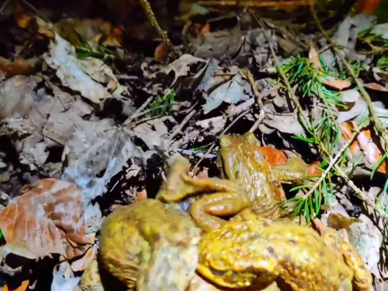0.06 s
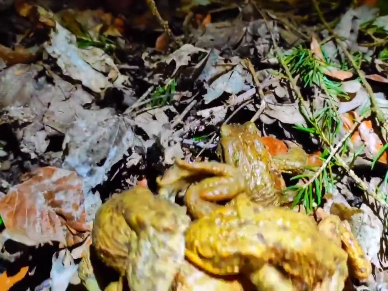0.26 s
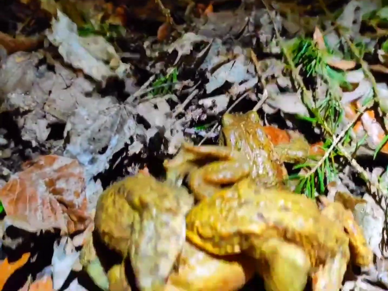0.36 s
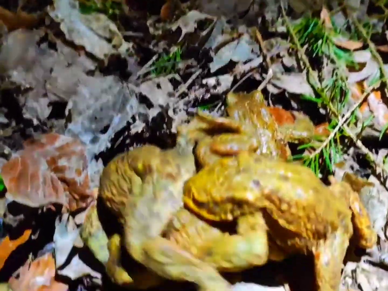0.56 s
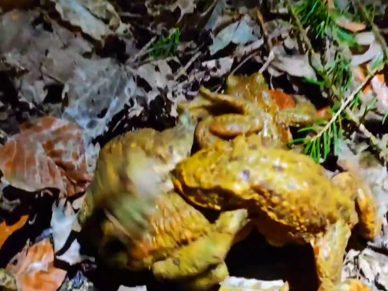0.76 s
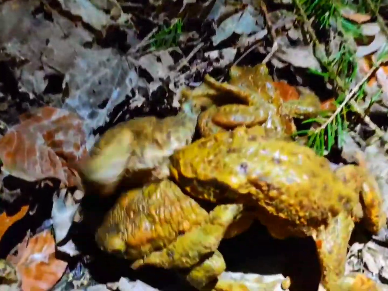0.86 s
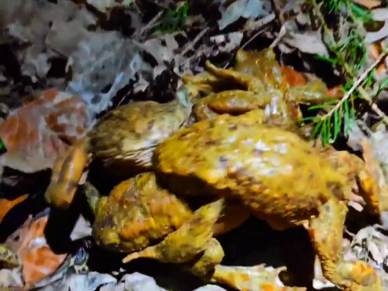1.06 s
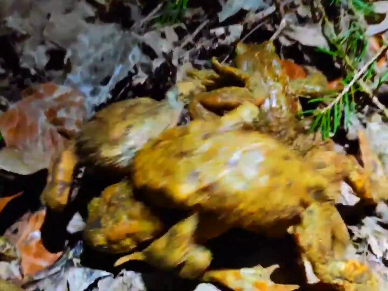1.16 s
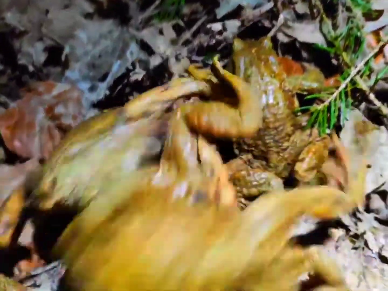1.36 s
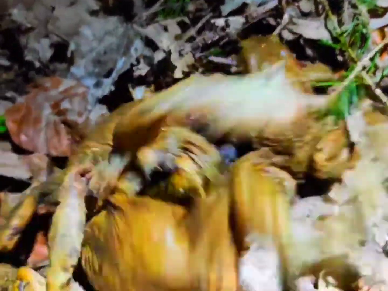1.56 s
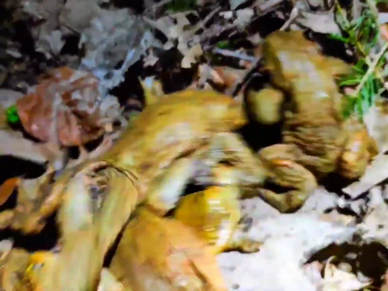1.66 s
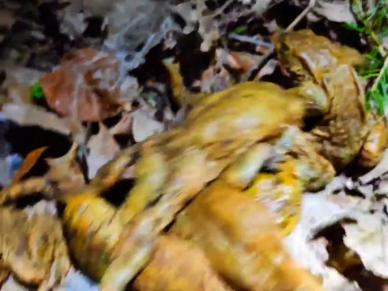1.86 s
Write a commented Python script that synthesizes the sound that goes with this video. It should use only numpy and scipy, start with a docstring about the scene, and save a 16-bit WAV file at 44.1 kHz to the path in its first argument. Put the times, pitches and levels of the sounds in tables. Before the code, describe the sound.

Dry leaves rustle and crunch under kicking toads, with one short, clear toad chirp.

```python
"""A hand rumbles on a camera, over faint hiss, while a fingertip rubs the right microphone port.
The finger bumps the covered port, then comes unstuck with a pop as its seal breaks.
Close by, toads scramble over dry leaves on a forest floor, shuffling lightly, then kicking hard;
the leaves crackle, snap and crunch under their weight.
As the kicking starts, one toad gives a short, clear chirp."""
import sys
import numpy as np
from scipy import signal
from scipy.fft import rfft, irfft, next_fast_len
from scipy.io import wavfile
from scipy.ndimage import map_coordinates

SR = 44100
rng = np.random.default_rng(int(sys.argv[2]) if len(sys.argv) > 2 else 0)


def generate_wav(sig):
    """Save sig (samples, or channels by samples) to the path in sys.argv[1] as 16-bit PCM at SR."""
    pcm = np.round(np.clip(np.atleast_2d(sig).T, -1, 1) * 32767).astype(np.int16)
    wavfile.write(sys.argv[1], SR, pcm)


N = 85995
TIME_S = np.arange(N) / SR


def amp(db):
    """Decibels to gain."""
    return 10 ** (np.asarray(db) / 20)


def unit(x):
    """Scale to rms 1."""
    return x / np.sqrt(np.mean(x ** 2) + 1e-20)


def along(points, hz):
    """Interpolate (frequency, value) points on a log axis."""
    f, v = np.transpose(points)
    return np.interp(np.log(hz + 1), np.log(f + 1), v)


def curves(rows):
    """One per-sample curve for each column after the time."""
    s, *cols = np.transpose(rows)
    return [np.interp(TIME_S, s, c) for c in cols]


def wobble(rate_hz):
    """Smooth random curve with knots at rate_hz."""
    return map_coordinates(rng.standard_normal(int(N * rate_hz / SR) + 4), [TIME_S * rate_hz])


def filtered(x, response):
    """Apply a complex frequency response."""
    m = next_fast_len(N + SR // 2)
    return irfft(rfft(x, m) * response(np.fft.rfftfreq(m, 1 / SR)), m)[..., :N]


def noise(colour, channels=1):
    """Coloured noise, rms 1."""
    return unit(filtered(rng.standard_normal((channels, N)), lambda hz: amp(along(colour, hz))))


def pan_gains(pan_db):
    """Left and right gain; pan is left minus right."""
    return amp(np.array([[.5], [-.5]]) * pan_db)


def mid_side_gains(correlation, hz):
    """Mid and side weights for a left-right correlation table."""
    angle = np.arccos(np.clip(along(correlation, hz), -1, 1)) / 2
    return np.array([np.cos(angle), np.sin(angle)])


# Background spectra (frequency [Hz], gain [dB])
RUMBLE_COLOUR = [(15, 0.5), (35, -1), (60, -8), (110, -13), (200, -19), (400, -26), (800, -34.5),
                 (2000, -43.5), (5000, -44)]
HISS_COLOUR = [(500, 36), (2000, 14), (5000, 6), (8500, -28), (10000, -12), (12000, -30), (15000, -14)]

def rumble_and_hiss():
    """The hand on the camera rumbles unevenly over steady hiss."""
    rumble = amp(-47.5 + 1.5 * wobble(8.39)) * noise(RUMBLE_COLOUR, channels=2)
    hiss = amp(-69.5) * noise(HISS_COLOUR, channels=2)
    return rumble + hiss


# Skin friction (time [s], level [dB])
RUB_LEVEL = [(0, -45), (.1, -48.5), (.19, -37.5), (.22, -33), (.275, -33), (.3, -38), (.34, -40), (.4, -36),
             (.46, -52)]
# Friction spectrum (frequency [Hz], gain [dB])
RUB_SPECTRUM = [(20, 7), (50, -2.5), (100, -5), (160, -18.5), (230, -18), (400, -33.5), (1000, -40),
                (3000, -80.5)]
# Soft knocks (time [s], gain [dB], half width [s])
FINGER_BUMPS = [(.212, -28, .003), (.229, -21, .004), (.27, -20, .0035)]

def finger_rub():
    """The fingertip shifts on the port; each bump is one swing of pressure."""
    rub_db, = curves(RUB_LEVEL)
    sound = amp(rub_db) * noise(RUB_SPECTRUM)[0]
    for s, db, half_width_s in FINGER_BUMPS:
        offset = (TIME_S - s) / half_width_s
        sound += amp(db) * offset * np.exp(-.5 * offset ** 2)
    return sound


POP_S, PORT_LEAK_HZ = .339, 27
PULL_LEAD_S, PULL_RISE_S, RELEASE_S, PEEL_DECAY_S = .0195, .012, .00023, .03
# Skin tearing free (time [s], gain [dB], width [ms])
SKIN_TEARS = [(0.33, -26, 0.77), (0.3343, -19.5, 0.47), (.339, -1.5, 0.19), (.348, -25.5, 0.11),
              (0.3604, -25.5, 0.1), (0.364, -15.5, 0.084)]
# Port response and peeling spectrum (frequency [Hz], gain [dB])
PORT_COLOUR = [(1800, 0), (3200, -6), (6000, 3), (9000, -1)]
PEEL_SPECTRUM = [(300, -2), (1500, 5), (4000, 3.5), (7000, 1), (10000, -34), (14000, -6)]

def finger_pop():
    """The lifting finger sucks at the leaky port; the seal breaks and skin peels off in ticks."""
    age = np.maximum(TIME_S - POP_S, 0)
    pull = np.clip((TIME_S - POP_S + PULL_LEAD_S) / PULL_RISE_S, 0, 1)
    suction = amp(-7.5) * np.sin(np.pi / 2 * pull) ** 2 * np.exp(-age / RELEASE_S)
    tears = sum(amp(db) * np.exp(1 - np.hypot(1, 2000 * (TIME_S - s) / width_ms))
                for s, db, width_ms in SKIN_TEARS)
    port = lambda hz: amp(along(PORT_COLOUR, hz)) * 1j * hz / (1j * hz + PORT_LEAK_HZ)
    peel = amp(-45) * (TIME_S > POP_S) * np.exp(-age / PEEL_DECAY_S) * noise(PEEL_SPECTRUM)[0]
    return filtered(-suction - tears, port) + peel


def leaf_scrapes(x, depth_db=2.5, patch_hz=833, patch_s=.022):
    """Each leaf scrapes in its own band for a moment: random gain in time-frequency patches."""
    hz, t, spectrum = signal.stft(x, SR, nperseg=256)
    grid = np.meshgrid(hz / patch_hz, t / patch_s, indexing="ij")
    patches = map_coordinates(rng.standard_normal((128, 512)), grid, mode="wrap")
    return signal.istft(spectrum * amp(depth_db * patches), SR, nperseg=256)[1][:, :N]


def leaf_crackle(colour, correlation, pan, grains_per_s=900, spread_db=4, grain_share=.41):
    """Tiny fractures over the hiss of sliding leaves; stereo, rms 1."""
    breaks = rng.random((2, N)) < grains_per_s / SR
    size_db = spread_db * np.minimum(rng.exponential(size=(2, N)), 4)
    grains = unit(breaks * np.sign(rng.standard_normal((2, N))) * amp(size_db))
    slide = rng.standard_normal((2, N))
    texture = leaf_scrapes(np.sqrt(grain_share) * grains + np.sqrt(1 - grain_share) * slide)
    mid, side = filtered(texture, lambda hz: amp(along(colour, hz)) * mid_side_gains(correlation, hz))
    return unit(filtered(np.array([mid + side, mid - side]), lambda hz: pan_gains(along(pan, hz))))


# Toads' effort (time [s], level [dB])
RUSTLE_LEVEL = [(0, -61), (.36, -70), (.41, -54), (.44, -67), (.51, -53.5), (.6, -59), (.645, -49.5),
                (.675, -49.5), (.705, -60.5), (.79, -50), (.87, -63.5), (.97, -67), (1.1, -52.5),
                (1.165, -59), (1.176, -43), (1.21, -39), (1.24, -39.5), (1.255, -48), (1.28, -55),
                (1.31, -42.5), (1.335, -48), (1.385, -42), (1.435, -44), (1.495, -39), (1.548, -47),
                (1.637, -38.5), (1.66, -44), (1.75, -46.5), (1.8, -52), (1.845, -48), (1.875, -39.5),
                (1.905, -46.5), (1.95, -44.5)]
# Toads' position (time [s], pan [dB])
RUSTLE_PAN = [(1.1, 7.5), (1.2, -1.5), (1.4, -3.5), (1.5, 2), (1.62, 0.5), (1.8, 0.5), (1.93, 1.5)]
# Leaf spectra (frequency [Hz], gain [dB])
SHUFFLE_COLOUR = [(150, -11), (500, -2.5), (1200, -2), (2200, -6.5), (4000, -4), (6000, -2.5), (7800, 4),
                  (9800, -14), (12000, -7), (15500, -6.5)]
KICK_COLOUR = [(120, -41), (350, -24.5), (900, -15.5), (2200, -17), (4500, -12.5), (6000, -12.5),
               (7200, -6), (8400, -1), (9700, -17), (12000, -16), (15500, -19.5)]
# Stereo likeness (frequency [Hz], correlation [-1..1])
SHUFFLE_CORRELATION = [(300, 1), (1500, -0.17), (5000, 0.12), (7500, 0.7), (10500, 1), (14000, 0.78)]
KICK_CORRELATION = [(300, 1), (1500, -0.11), (5900, 0.081), (7000, 0.92), (10000, 0.85), (14000, 0.092)]
# Stereo balance (frequency [Hz], pan [dB])
SHUFFLE_BALANCE = [(400, -2.5), (2400, -10), (8000, -9), (15000, -7)]
KICK_BALANCE = [(400, 1.5), (2400, -5), (4400, -1), (8000, -1), (15000, -5.5)]

def leaf_rustle(kick_start_s=1.168, flicker_db=1.68):
    """The leaves follow the toads' effort: light shuffling, then hard kicking."""
    level_db, = curves(RUSTLE_LEVEL)
    pan_db, = curves(RUSTLE_PAN)
    shuffle = leaf_crackle(SHUFFLE_COLOUR, SHUFFLE_CORRELATION, SHUFFLE_BALANCE)
    kick = leaf_crackle(KICK_COLOUR, KICK_CORRELATION, KICK_BALANCE)
    texture = np.where(TIME_S < kick_start_s, shuffle, kick)
    return amp(level_db + flicker_db * wobble(70.17)) * pan_gains(pan_db) * texture


# Snaps and thuds (time [s], gain [dB], centre [Hz], t60 [s], pan [dB])
LEAF_SNAPS = [(0.083, -49.5, 8060, 0.0065, 13), (.124, -51.5, 1020, 0.019, 8), (0.171, -51, 1100, 0.012, 7),
              (0.288, -49.5, 5650, 0.01, 18), (.413, -46.5, 6850, 0.015, 6),
              (.459, -48, 6160, 0.009, -14.5), (0.488, -48, 2220, 0.0092, -20),
              (.618, -49, 11000, 0.014, 5), (.639, -47, 8100, 0.014, -24.5),
              (0.742, -44.5, 7700, 0.011, -3), (0.79, -33.5, 5740, 0.007, -5), (.84, -49.5, 8250, 0.014, 2),
              (1.094, -43.5, 8500, 0.015, -3), (1.172, -46, 8200, 0.0076, -27),
              (1.235, -43, 7360, 0.061, 4), (1.312, -30.5, 7240, 0.006, 1), (1.389, -23, 7800, 0.0033, -11),
              (1.424, -40.5, 5440, 0.022, 2), (1.446, -52, 8600, 0.0085, 0), (1.48, -47.5, 335, 0.057, 1),
              (1.487, -25, 8200, 0.0054, -4), (1.598, -39, 8300, 0.013, 9), (1.683, -40, 8200, 0.011, 0),
              (1.821, -38, 7500, 0.027, -5), (1.924, -34, 7940, 0.019, 2)]

def leaf_snaps(rise_s=.001, width_oct=.35, length=4096):
    """Leaves give way under the toads: fast-dying noise bursts, each strongest around one pitch."""
    out = np.zeros((2, N + length))
    age, hz = np.arange(length) / SR, np.fft.rfftfreq(length, 1 / SR)
    stereo = mid_side_gains(KICK_CORRELATION, hz)
    for s, db, centre_hz, t60_s, pan_db in LEAF_SNAPS:
        broad = amp(-6 + along(SHUFFLE_COLOUR, hz) / 2) / np.hypot(1, hz / (4 * centre_hz))
        peak = np.exp(-.5 * (np.log2((hz + 1) / centre_hz) / width_oct) ** 2)
        mid, side = irfft(rfft(rng.standard_normal((2, length))) * (broad + peak) * stereo)
        burst = unit(np.array([mid + side, mid - side]))
        envelope = 2 * amp(db - 60 * age / t60_s) * (1 - np.exp(-age / rise_s))
        start = round(s * SR)
        out[:, start:start + length] += pan_gains(pan_db) * envelope * burst
    return out[:, :N]


# Weight on the litter (time [s], level [dB])
CRUNCH_LEVEL = [(1.1, -64), (1.18, -66.5), (1.26, -52), (1.33, -67), (1.42, -54.5), (1.49, -49),
                (1.55, -52.5), (1.62, -46.5), (1.68, -54.5), (1.74, -54.5), (1.8, -55.5), (1.88, -57),
                (1.95, -59)]
# Crunch spectrum (frequency [Hz], gain [dB])
CRUNCH_COLOUR = [(100, -17), (330, -1.5), (800, -12.5), (1600, -3.5), (2300, -8), (4500, -4), (7000, -11.5)]

def litter_crunch():
    """The toads' bodies press the litter down with a dull crunch."""
    level_db, = curves(CRUNCH_LEVEL)
    started = TIME_S > CRUNCH_LEVEL[0][0]
    return amp(level_db) * started * leaf_crackle(CRUNCH_COLOUR, KICK_CORRELATION, KICK_BALANCE)


PITCH_JITTER, CALL_EDGE_S, CALL_PAN_DB, LEFT_LAG_S = .00085, .0065, .7, .00017
BUZZ_DB, BUZZ_DECAY_S, FLUTTER_DB, DRIFT_RAD = 6, .04, 2.2, .4
# Toad call (time [s], pitch [Hz], level [dB])
CALL = [(1.258, 1118, -30), (1.265, 1074, -32.5), (1.272, 1036, -30), (1.292, 1011, -29),
        (1.333, 997.4, -28), (1.372, 1010, -31.5), (1.402, 1040, -36), (1.422, 1056, -41.5),
        (1.429, 1110, -55)]
# Overtones (harmonic number, level [dB re fundamental])
CALL_OVERTONES = [(2, -30.5), (3, -33), (4, -29), (5, -44), (6, -30.5), (7, -43), (8, -44)]

def toad_chirp():
    """A nearly pure tone, sagging in pitch while strongest; weak overtones buzz at its onset."""
    start_s, end_s = CALL[0][0], CALL[-1][0]
    pitch_hz, level_db = curves(CALL)
    phase = 2 * np.pi * np.cumsum(pitch_hz * (1 + PITCH_JITTER * wobble(150))) / SR
    buzz_db = BUZZ_DB * np.exp(-np.abs(TIME_S - start_s) / BUZZ_DECAY_S)
    delay_s = np.array([[.5], [-.5]]) * LEFT_LAG_S
    ports = lambda hz: pan_gains(CALL_PAN_DB) * np.exp(-2j * np.pi * hz * delay_s)
    tone = filtered(np.sin(phase), ports)
    for harmonic, db in CALL_OVERTONES:
        gain = amp(db + buzz_db + FLUTTER_DB * wobble(120))
        tone += gain * np.sin(harmonic * phase + DRIFT_RAD * wobble(82))
    gate = np.clip(np.minimum(TIME_S - start_s, end_s - TIME_S) / CALL_EDGE_S + .5, 0, 1)
    return np.sqrt(2) * amp(level_db) * gate * tone


def scene():
    """The toads reach both ports; the finger sounds only on the right one."""
    left, right = leaf_rustle() + litter_crunch() + toad_chirp()
    covered = amp(-34 * (TIME_S < POP_S))  # the finger blocks the rustle until the pop
    right = right * covered + finger_pop() + finger_rub()
    return np.array([left, right]) + leaf_snaps() + rumble_and_hiss()


def record(dry):
    """The camera keeps nothing above its band limit."""
    return filtered(dry, lambda hz: hz < 15850)


dry = scene()
out = record(dry)
generate_wav(out)
```